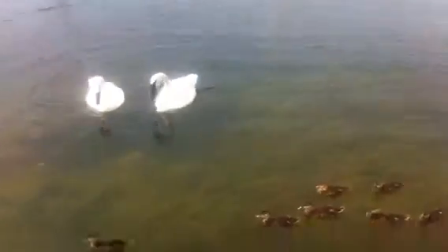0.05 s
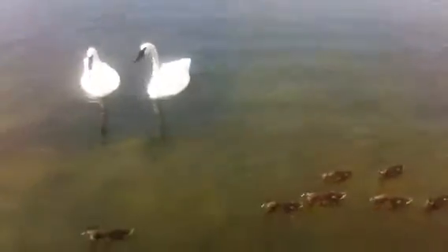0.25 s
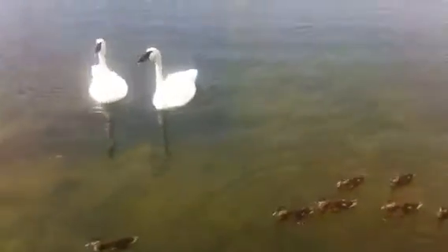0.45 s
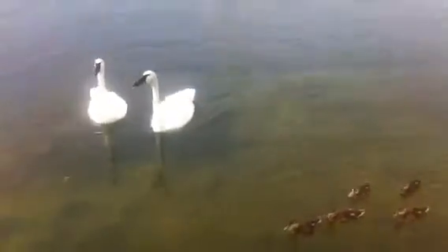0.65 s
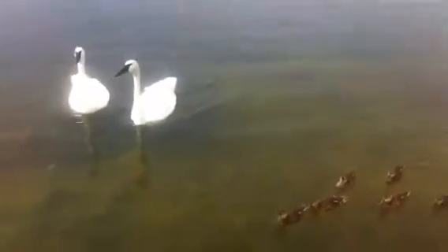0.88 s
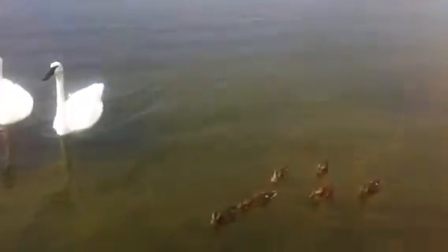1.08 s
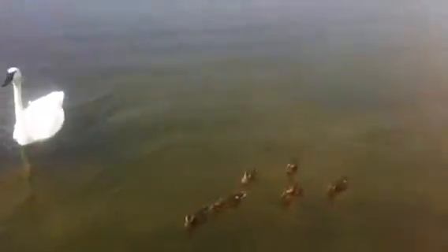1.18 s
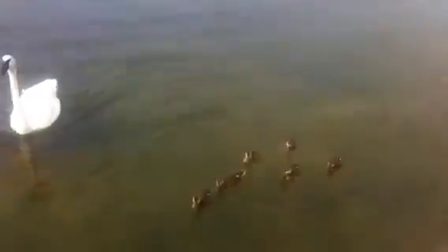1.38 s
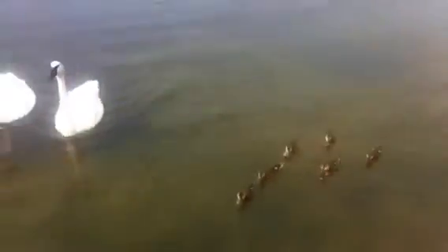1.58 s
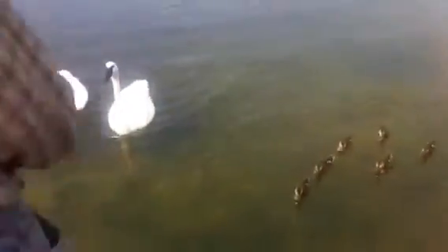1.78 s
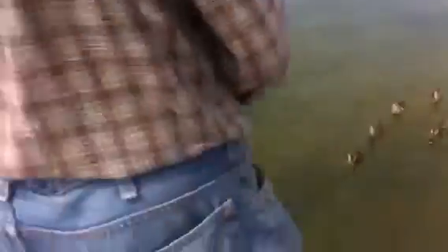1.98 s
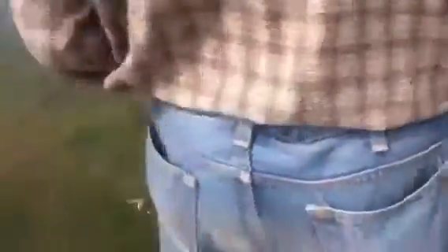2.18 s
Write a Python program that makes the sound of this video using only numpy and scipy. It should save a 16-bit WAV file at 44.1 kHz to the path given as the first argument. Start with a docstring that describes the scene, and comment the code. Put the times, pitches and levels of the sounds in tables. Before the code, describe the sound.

A swan honks five times in quick succession, the first short and weak, with small grunts from a second bird. Lapping water, soft plops and bright hiss continue outdoors, with brief cloth rustle near a small handheld microphone.

```python
"""Soft plops and knocks run throughout over lapping water and a bright hiss; a second bird grunts just
before the first honk and again during the second.
A swan standing in shallow water gives one short and four full trumpet-like honks, with a dull echo.
Honks are sums of phase-locked overtones; grunts are pulses exciting throat resonances; plops are struck
resonators; water is shaped noise with small bubbles; hiss, cloth rustle and scratches are filtered noise."""
import sys
import numpy as np
from scipy import signal
from scipy.io import wavfile

SR = 44100
rng = np.random.default_rng(int(sys.argv[2]) if len(sys.argv) > 2 else 0)


def pcm_store(signal):
    """Save signal as 16-bit PCM."""
    levels = np.round(np.clip(np.atleast_2d(signal), -1, 1) * 32767)
    wavfile.write(sys.argv[1], SR, levels.astype(np.int16).T)


N = 99225  # samples: 2.25 s


def from_db(db):
    """Decibel definition: amplitude ratio = 10^(dB/20)."""
    return 10 ** (np.asarray(db) / 20)


def rms_one(x):
    """Normalisation to unit root-mean-square amplitude."""
    return x / np.sqrt(np.mean(x ** 2) + 1e-20)


def at_hz(points, hz):
    """Spectral envelope: dB interpolated along a logarithmic frequency axis."""
    points_hz, points_db = np.transpose(points)
    return np.interp(np.log(hz), np.log(points_hz), points_db)


def level(rows):
    """Temporal envelope: dB interpolated linearly in time."""
    s, db = np.transpose(rows)
    return np.interp(np.arange(N) / SR, s, db)


def band_pass(x, band_hz):
    """Band-pass filtering by a Butterworth response."""
    return signal.sosfilt(signal.butter(2, band_hz, "band", fs=SR, output="sos"), x)


def drift(rate, size=N):
    """Random modulation: noise through two equal one-pole low-passes with corner `rate` in Hz; rms 1."""
    r = np.exp(-2 * np.pi * rate / SR)
    white = rng.standard_normal(size + SR // 2)
    slow = signal.lfilter([1], [1, -2 * r, r * r], white)
    return rms_one(slow[SR // 2:])  # the filter's first half second is dropped


def ring(clicks, hz, t60):
    """Impulse response of a damped resonator: a unit click starts a decaying sine of initial height 1."""
    r, w = from_db(-60 / (t60 * SR)), 2 * np.pi * hz / SR
    return signal.lfilter([0, np.sin(w)], [1, -2 * r * np.cos(w), r * r], clicks + 1e-18)


def banded_noise(spectrum, patchy_db):
    """Third-octave synthesis: noise bands, each with its own level and partly shared flicker; rms 1."""
    out, together, white = 0, drift(13.4), rng.standard_normal((2, N))
    lowest, highest = spectrum[0][0], spectrum[-1][0]
    edges = np.geomspace(lowest, highest, int(3 * np.log2(highest / lowest)) + 1)
    for k, (low, high) in enumerate(zip(edges, edges[1:])):
        band = band_pass(white[k % 2], [low, high])  # neighbouring bands are independent
        flicker_db = patchy_db * (0.9 * together + drift(23.3))
        out = out + band * from_db(at_hz(spectrum, np.sqrt(low * high)) + flicker_db)
    return rms_one(out)


def hiss():
    """Broadband noise: a bright spectral envelope, steady at first, then changing in level."""
    # spectral density: f/Hz, relative level/dB per Hz
    hiss_spectrum = [(820, -36), (1400, -13.5), (1630, -5), (2170, -2.5), (2350, -9), (2530, -7.5),
                     (5830, -11), (13000, -13), (16000, -22.5)]
    # loudness course: t/s, level/dB
    hiss_course = [(0.8, -50.5), (1.332, -50.5), (1.494, -51), (1.514, -47), (1.53, -49.5), (1.796, -51),
                   (1.816, -45), (1.998, -55), (2.072, -57.5), (2.204, -57.5), (2.216, -57), (2.25, -58)]
    return from_db(level(hiss_course)) * banded_noise(hiss_spectrum, patchy_db=.4)


def water():
    """Bubble acoustics: small bubbles ring as damped resonators within lumpy low noise."""
    # spectral density of the lapping: f/Hz, relative level/dB per Hz
    water_spectrum = [(24, -52), (40, -30), (72, -9), (182, 1.5), (301, -7.5), (543, -0.5), (604, -10.5),
                      (869, -1.5), (1090, -9), (1500, -8.5), (1950, -30), (3300, -120)]
    # loudness course: t/s, level/dB
    water_course = [(0.0, -38), (0.09, -43), (0.31, -49), (0.44, -45), (0.74, -43), (0.9, -45.5),
                    (1.21, -48), (1.53, -49), (2.25, -47.5)]
    burble_per_s, burble_db = 65, -10  # bubble rate; bubble level relative to the noise
    sizes = from_db(4 * np.minimum(rng.exponential(1, N), 4)) * rng.choice([-1, 1], N)
    born = rng.random(N) < burble_per_s / SR
    dealt = rng.integers(0, 14, N)  # each bubble gets one of 14 pitches
    bubbles = 0
    for k, hz in enumerate(np.geomspace(140, 1500, 14)):
        bubbles = bubbles + ring(sizes * born * (dealt == k), hz, 9.0 / hz)  # 60 dB down in 9 cycles
    lapping = banded_noise(water_spectrum, patchy_db=1.2)
    return from_db(level(water_course)) * (lapping + from_db(burble_db) * rms_one(bubbles))


def rustle():
    """Friction noise: cloth rubs near the microphone in dense random grains that start at once and fade."""
    # pass band of the cloth: lower and upper f/Hz
    cloth_band = [250, 850]
    start_s, fade_s, grains_per_s, rustle_db = 1.802, .045, 500, -44
    after = np.arange(N) / SR - start_s
    grains = (rng.random(N) < grains_per_s / SR) * rng.standard_normal(N)
    rubbing = rms_one(band_pass(grains, cloth_band))
    return from_db(rustle_db) * rubbing * (after > 0) * np.exp(-(after / fade_s) ** 2 / 2)


def scratches():
    """Gated noise: bright band-passed noise under brief Gaussian envelopes."""
    # scratches: centre t/s, level/dB
    scratch_rows = [(1.513, -49), (1.82, -43), (1.865, -52.5)]
    width_s = .0032  # standard deviation of each envelope
    noise = rms_one(band_pass(rng.standard_normal(N), [4200, 6100]))
    t = np.arange(N) / SR
    return noise * sum(from_db(db) * np.exp(-((t - s) / width_s) ** 2 / 2) for s, db in scratch_rows)


def plops():
    """Struck resonance: a soft push and a noise puff ring briefly at one pitch, with a dry tick."""
    # plops and knocks: t/s, strike level/dB, f/Hz, t60 of the noise puff/s, relative tick level/dB
    plop_rows = [(0.015, -34.5, 430, 0.089, -5.5), (0.049, -33, 142, 0.1, -3),
                 (0.614, -29.5, 230, 0.039, -6), (0.638, -36.5, 870, 0.024, -3.5),
                 (0.774, -22, 596, 0.068, -5.5), (0.809, -33.5, 538, 0.11, -5),
                 (0.873, -28.5, 204, 0.068, -8), (0.887, -32, 185, 0.12, -8), (0.94, -32, 854, 0.058, -2),
                 (1.018, -38, 164, 0.12, -9), (1.211, -29.5, 135, 0.043, -7), (1.358, -30, 284, 0.042, -6),
                 (1.475, -28.5, 202, 0.09, -8), (1.511, -33.5, 250, 0.077, -7),
                 (1.803, -42, 324, 0.057, -13), (1.819, -36, 562, 0.1, -12), (1.841, -28.5, 396, 0.057, -8),
                 (1.863, -35, 480, 0.05, -7), (1.916, -32.5, 161, 0.077, -7), (1.964, -34, 460, 0.059, -7),
                 (2.021, -34.5, 146, 0.054, -6), (2.195, -33, 990, 0.041, -3)]
    out = np.zeros(N)
    for s, db, hz, t60, tick_db in plop_rows:
        click = np.zeros(N)
        click[int(s * SR)] = from_db(db)
        decay = signal.lfilter([1], [1, -from_db(-60 / (t60 * SR))], click)
        puff = decay * rng.standard_normal(N)
        push = signal.lfilter([.15], [1, -.85], click + .04 * puff)  # one-pole softening
        tick = band_pass(puff, [150, 2380])
        out += ring(push, hz, .5 * t60) + from_db(tick_db) * tick  # resonator t60 is half the puff's
    return out


def grunts():
    """Source-filter principle: uneven pulses, each trailing a little noise, excite a short throat."""
    # grunts of the second bird: t/s, length/s, pitch f/Hz, pulse level/dB, upper resonances' level/dB
    grunt_rows = [(0.07, 0.031, 342.6, -27, 2), (0.277, 0.047, 325.6, -26, -29)]
    # throat resonances: centre f/Hz, width/Hz, level/dB
    throat = [(313, 120, -12), (610, 305, 4), (940, 370, -1.5), (1480, 200, -1.5), (1910, 190, -3.5),
              (3900, 1200, 0)]
    jitter, rasp = .035, .35  # relative spread of the periods; strength of the trailing noise
    out = 0
    for s, length, hz, db, upper_db in grunt_rows:
        pulses = np.zeros(N)
        times = np.cumsum((1 + jitter * rng.standard_normal(30)) / hz)
        times = times[times < length]
        pulse_db = db + 2 * rng.standard_normal(len(times))
        arch = np.sin(np.pi * times / length) ** .5  # swells and dies over the grunt
        pulses[((s + times) * SR).astype(int)] = from_db(pulse_db) * arch
        trail = signal.lfilter([.2], [1, -.98], pulses)
        pulses = pulses + rasp * trail * rng.standard_normal(N)
        for k, (centre_hz, width, throat_db) in enumerate(throat):
            gain = (-1) ** k * from_db(throat_db + upper_db * (k > 2))  # alternating sign
            out = out + gain * ring(pulses, centre_hz, 2.2 / width)
    return out


def honk(rows, pipe):
    """Harmonic synthesis: two steep unequal pulses a cycle; unsteady phase makes the overtones rasp."""
    jitter, breath_db = .0012, -36  # relative pitch wobble; air noise relative to the tone
    steady_rad, onset_rad, onset_s = .012, .06, .026  # phase wander: held tone; extra at the start
    break_s, break_width_s, break_rad = .421, .005, .1  # the voice cracks once
    waver_db = 1.5  # slow swell of the eighth overtone
    lean_rad = np.pi / 4  # pulses lean to the upper side
    spread_rad = .012  # windpipe delay of high overtones, times multiple squared
    s, *columns = np.transpose(rows)
    t = np.arange(int(s[0] * SR), int(s[-1] * SR))  # sample numbers
    hz, *levels_db = [np.interp(t / SR, s, c) for c in columns]
    size = len(t)

    onset = onset_rad * np.exp(-((t / SR - s[0]) / onset_s) ** 4)
    crack = break_rad * np.exp(-((t / SR - break_s) / break_width_s) ** 2)
    wander = (steady_rad + onset + crack) * drift(250.0, size=size)
    wobbling_hz = hz * (1 + jitter * drift(60.0, size=size))
    phase = 2 * np.pi * np.cumsum(wobbling_hz) / SR + wander

    k, k_db = np.transpose(pipe)[:, :, None]
    swells = np.array([drift(12.0, size=size) for _ in pipe])
    swell_db = waver_db * np.sqrt(k / 8) * swells  # more in the treble
    offset = np.pi / 2 * (k % 2) - lean_rad - spread_rad * k ** 2
    waves = -from_db(k_db + swell_db) * np.sin(k * phase + offset)
    groups = [k < 2.5, (k > 2.5) & (k < 11.5), k > 11.5]  # low, middle, treble
    tone = 0
    for chosen, db in zip(groups, levels_db):
        tone = tone + from_db(db) * rms_one(np.sum(waves * chosen, 0))
    breath = 1 + from_db(breath_db) * rng.standard_normal(size)
    out = np.zeros(N)
    out[t] = tone * breath * signal.windows.tukey(size, .08)
    return out


def honks():
    """Tube resonance: each honk's overtones take the levels shaped by the long windpipe."""
    # one table per honk: t/s, pitch f/Hz, level/dB of the two lowest overtones, of overtones 3-11
    # (about 1.1-5 kHz), of the treble
    honk_tables = [
        [(0.097, 435, -39, -35, -49), (0.109, 450, -29, -29.5, -40), (0.117, 441.1, -30.5, -38.5, -69),
         (0.128, 410, -37, -41, -51)],
        [(0.224, 460, -27, -54, -61), (0.228, 465, -45.5, -86, -80), (0.234, 451, -26, -30, -87),
         (0.242, 457.3, -27, -20.5, -31.5), (0.276, 456.2, -27.5, -17.5, -33.5),
         (0.294, 455.4, -23.5, -19, -32), (0.31, 440.3, -34, -25.5, -42.5), (0.326, 440, -53, -46, -67)],
        [(0.361, 464, -41, -56, -56), (0.365, 474, -30, -62, -87), (0.373, 458, -18, -16.5, -24.5),
         (0.381, 453.9, -19, -18, -21.5), (0.409, 447, -24.5, -16, -28), (0.423, 446.2, -19.5, -23, -34.5),
         (0.443, 435, -27, -41.5, -61), (0.453, 442.2, -55.5, -40, -45)],
        [(0.494, 434, -44, -45, -63), (0.502, 443, -30.5, -51, -74), (0.508, 456, -15.5, -22, -34),
         (0.514, 447.6, -16.5, -18.5, -25), (0.552, 445.2, -17, -17.5, -26.5), (0.566, 439.6, -20, -21.5, -28),
         (0.582, 422, -30.5, -37, -55.5), (0.596, 475, -64, -56, -54)],
        [(0.65, 453, -76, -40, -72), (0.656, 447, -37, -61, -67), (0.664, 432.5, -19, -25, -43),
         (0.672, 444, -15.5, -19, -30.5), (0.698, 436.4, -22, -27, -45.5), (0.726, 410, -40, -54, -57)],
    ]
    # windpipe shaping, one table per honk: multiple of the pitch [1], level within its group/dB
    pipe_1 = [(1, 2), (2, 8.5), (3, -6), (4, -3), (5, -9), (6, -12), (7, -14), (8, -14), (9, -10),
              (10, -11), (11, -13.5), (12, -18), (13, -16), (14, -27)]
    pipe_2 = [(1, 0), (2, -3), (3, -3), (4, -7), (5, -11.5), (6, -14.5), (7, -10), (8, -11), (9, -22),
              (10, -19.5), (11, -22.5), (12, -20.5), (13, -24), (14, -50), (15, -25), (16, -53),
              (17, -21.5), (18, -22), (19, -17), (20, -16), (21, -17), (22, -12), (23, -20), (24, -17),
              (25, -17), (26, -18), (27, -24), (28, -30), (29, -16), (30, -31), (31, -20), (32, -27),
              (33, -23), (34, -41)]
    pipe_3 = [(1, -7.5), (2, 6), (3, -1), (4, -9), (5, -6.5), (6, -5), (7, -13.5), (8, -3.5), (9, -12.5),
              (10, -8.5), (11, -13), (12, -18), (13, -12), (14, -20), (15, -20.5), (16, -39), (17, -27),
              (18, -22), (19, -19.5), (20, -14), (21, -14), (22, -14), (23, -17), (24, -11.5), (25, -15),
              (26, -13), (27, -9), (28, -27), (29, -29), (30, -28), (31, -12), (32, -26), (33, -18),
              (34, -30)]
    pipe_4 = [(1, -17), (2, 6.5), (3, -7), (4, -3.5), (5, -8), (6, -3), (7, -8.5), (8, -5), (9, -8),
              (10, -15), (11, -13), (12, -24), (13, -23), (14, -23.5), (15, -33), (16, -26), (17, -30),
              (18, -23.5), (19, -25), (20, -28), (21, -26), (22, -17.5), (23, -22), (24, -18), (25, -15),
              (26, -14.5), (27, -19), (28, -23), (29, -26), (30, -23), (31, -31), (32, -18), (33, -26),
              (34, -18), (35, -30)]
    pipe_5 = [(1, -24.5), (2, 0.5), (3, -10), (4, -8.5), (5, -20), (6, -7.5), (7, -24), (8, -6), (9, -18),
              (10, -12.5), (11, -28), (12, -27), (13, -30), (14, -31), (15, -37), (16, -52), (17, -36.5),
              (18, -36), (19, -38), (20, -28), (21, -32), (22, -36), (23, -28), (24, -36), (25, -26),
              (26, -37), (27, -26), (28, -37), (29, -35), (30, -34), (31, -31), (32, -34), (33, -31),
              (34, -38), (35, -33)]
    pipes = [pipe_1, pipe_2, pipe_3, pipe_4, pipe_5]
    return sum(honk(rows, pipe) for rows, pipe in zip(honk_tables, pipes))


def bank_echo(birds):
    """Reflection: the bank returns a delayed, low-passed copy of the calls."""
    echo_s, echo_db = .031, -27
    lag = int(echo_s * SR)
    dull = signal.lfilter([.2], [1, -.8], np.pad(birds, (lag, 0))[:N])
    return from_db(echo_db) * dull


def scene():
    """Superposition: the pressures of all sources add."""
    birds = honks() + grunts()
    surroundings = hiss() + water() + rustle() + scratches() + plops()
    return (surroundings + birds + bank_echo(birds))[None]


def record(dry):
    """Band limiting: the small microphone drops the deep bass; the top is cut steeply."""
    mic_low_hz, cutoff_hz = 103, 15850
    thin = signal.sosfilt(signal.butter(2, mic_low_hz, "high", fs=SR, output="sos"), dry)
    return signal.sosfilt(signal.ellip(12, .5, 70, cutoff_hz, fs=SR, output="sos"), thin)


dry = scene()
out = record(dry)
pcm_store(out)
```